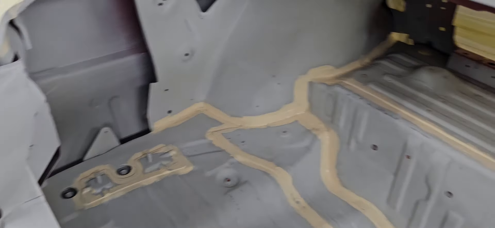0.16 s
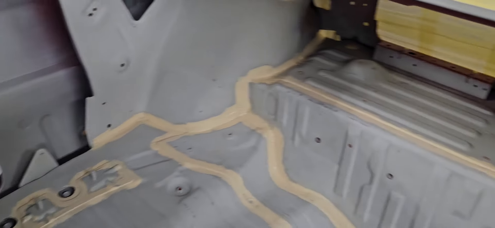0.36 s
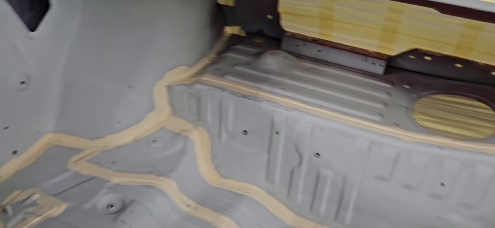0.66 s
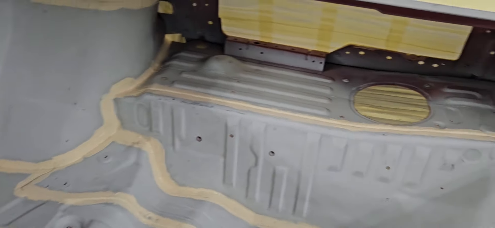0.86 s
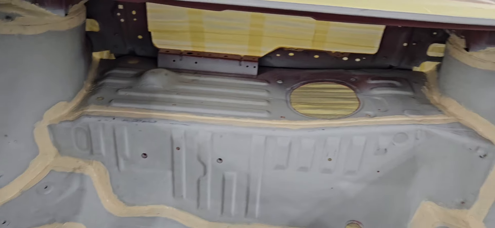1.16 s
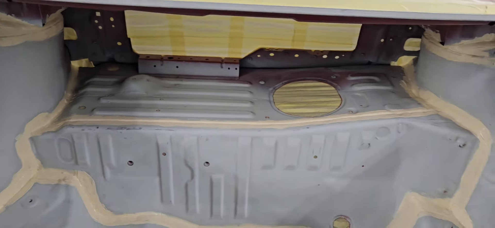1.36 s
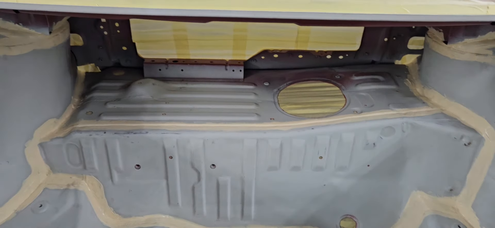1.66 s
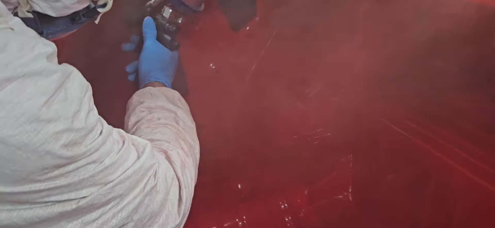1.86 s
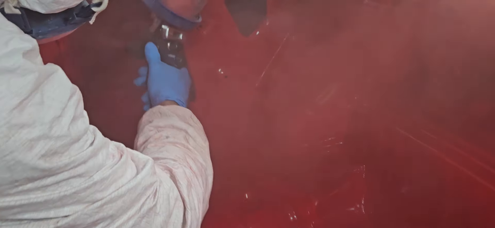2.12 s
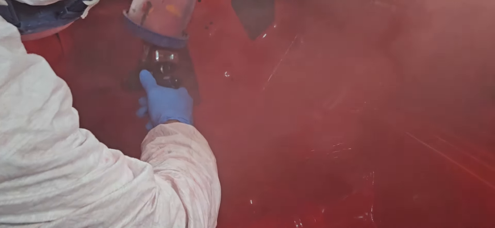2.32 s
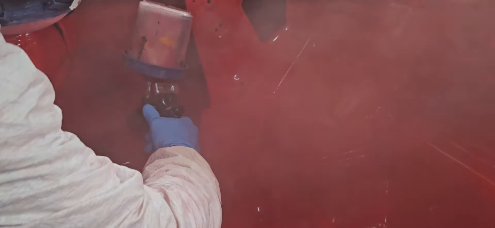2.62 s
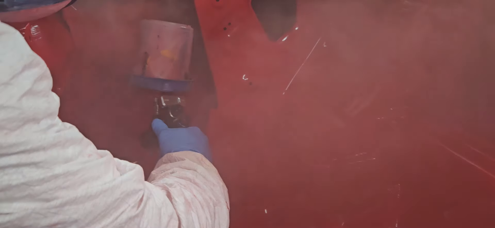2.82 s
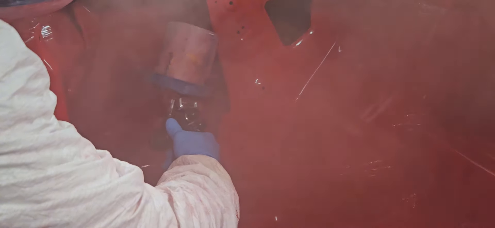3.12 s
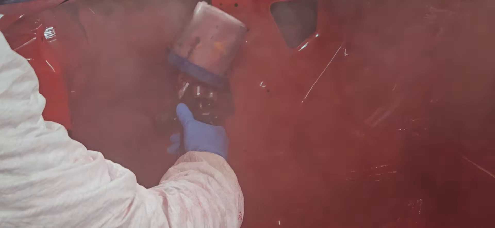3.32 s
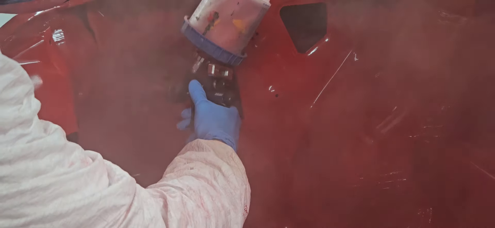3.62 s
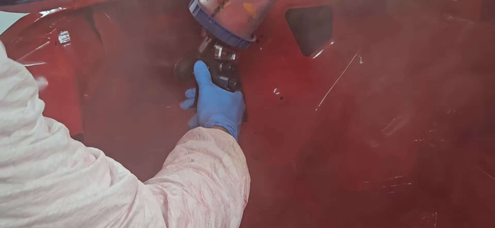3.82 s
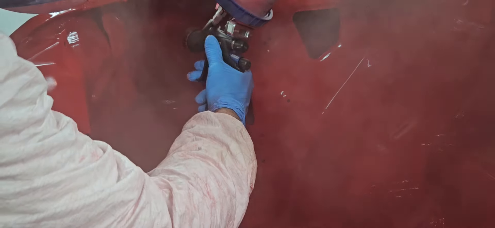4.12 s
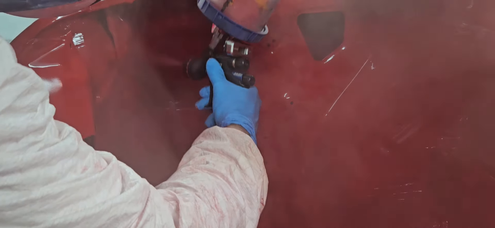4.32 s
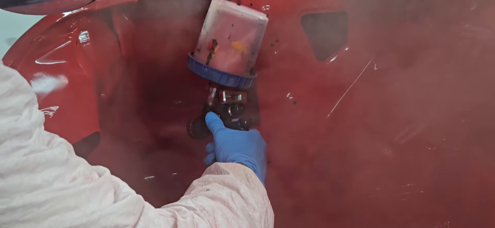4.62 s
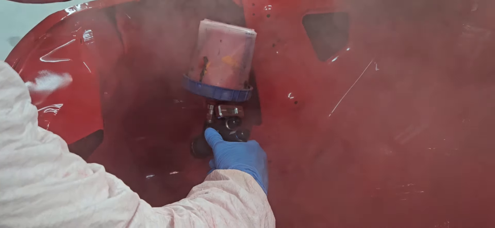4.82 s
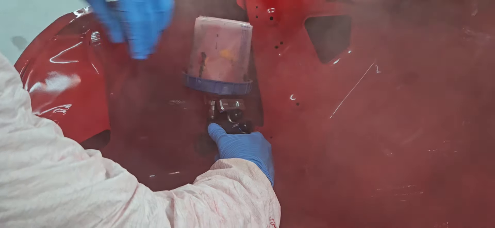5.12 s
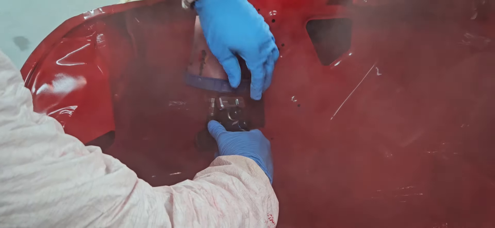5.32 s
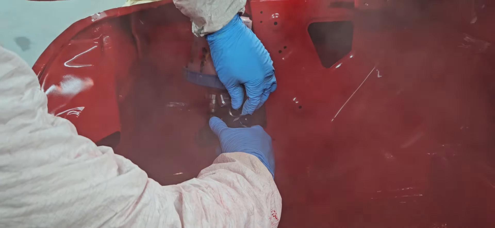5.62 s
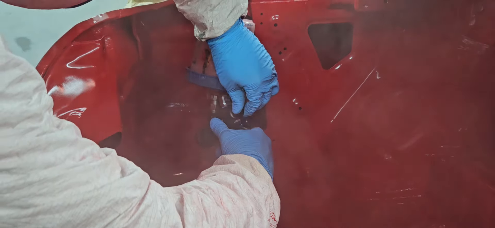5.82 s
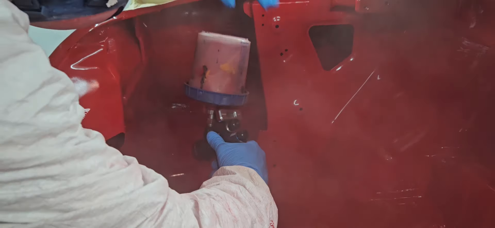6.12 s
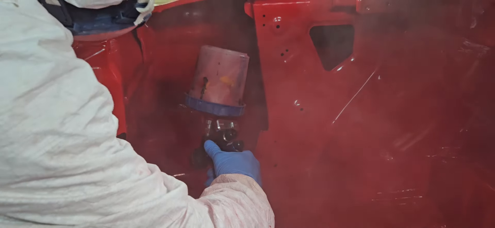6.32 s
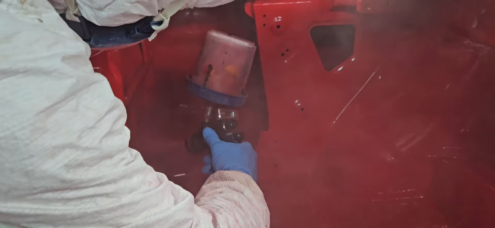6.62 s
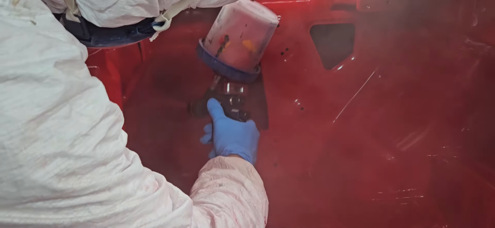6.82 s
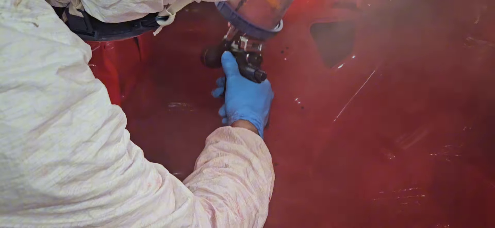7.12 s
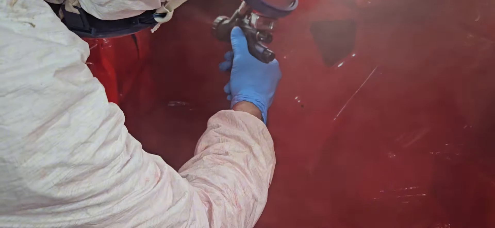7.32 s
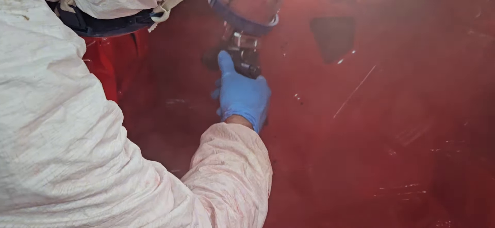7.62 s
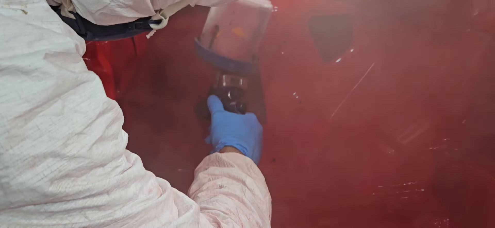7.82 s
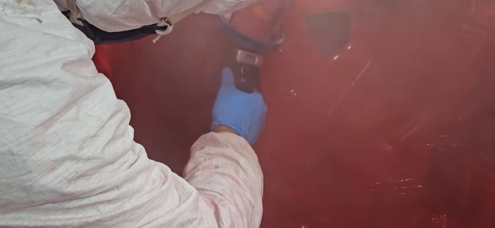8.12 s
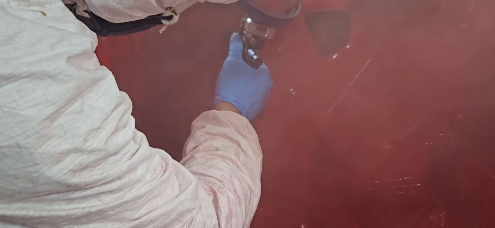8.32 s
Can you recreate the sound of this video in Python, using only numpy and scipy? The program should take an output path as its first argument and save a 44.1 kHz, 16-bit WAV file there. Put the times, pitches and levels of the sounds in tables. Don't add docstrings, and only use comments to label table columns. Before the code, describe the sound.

Quiet booth with faint fan hum, air hiss and gritty sole scuffs, then an abrupt loud spray gun hissing in passes over roaring extractors.

```python
import sys
import numpy as np
from scipy import signal
from scipy.fft import rfft, irfft, next_fast_len
from scipy.io import wavfile
from scipy.ndimage import uniform_filter1d, map_coordinates

SR = 44100
rng = np.random.default_rng(int(sys.argv[2]) if len(sys.argv) > 2 else 0)


def waveform_to_disk(signal):
    frames = np.transpose(np.atleast_2d(signal))
    scaled = np.clip(frames, -1, 1) * 32767
    samples = np.round(scaled).astype(np.int16)
    wavfile.write(sys.argv[1], SR, samples)


def to_linear_factor(level_db):
    exponent = np.asarray(level_db, float) / 20
    return 10 ** exponent


N = 373086
TIME = np.arange(N) / SR
IDLE_END_S, SPRAY_START_S = 1.873, 1.9112
IDLE_N = round(IDLE_END_S * SR)
TOP_HZ = 15735


def along(points, hz):
    f, v = np.transpose(points)
    return np.interp(np.log(hz + 1), np.log(f + 1), v)


def curves(rows):
    s, *cols = np.transpose(rows)
    return [np.interp(TIME, s, c) for c in cols]


def wobble(rate):
    knots = rng.standard_normal(int(N * rate / SR) + 4)
    return map_coordinates(knots, [TIME * rate])


def filtered(x, response):
    n = x.shape[-1]
    m = next_fast_len(n + 8192)
    return irfft(rfft(x, m) * response(np.fft.rfftfreq(m, 1 / SR)), m)[..., :n]


def shape(points):
    return lambda hz: to_linear_factor(along(points, hz))


def peaks(modes, base):
    return lambda hz: base + sum(to_linear_factor(db) / (1 + (2 * (hz - c) / w) ** 2) for c, w, db in modes)


def blur(x, bins, frames):
    x = uniform_filter1d(x, size=bins, axis=-2)
    x = uniform_filter1d(x, size=frames, axis=-1)
    return x / np.sqrt(np.mean(x ** 2))


# (frequency [Hz], level [dB])
LEFT_COLOUR = [(120, 1), (200, 4.5), (380, 0), (2400, 1.96), (5000, -4.5), (6900, 2.5), (7100, 4),
               (8600, 6.5), (9250, 1), (9330, -6.5), (10100, -6), (12200, -0.5), (12800, -0.5), (14500, 0),
               (15700, 4)]
# (frequency [Hz], level [dB])
RIGHT_COLOUR = [(120, 1), (200, 0), (380, 0), (2400, 1.3), (5300, 1), (6800, 3), (7300, 10.5), (8300, 8),
                (8950, 4), (9050, 1.5), (10000, -9.5), (11200, -6), (12400, 6), (13300, 3), (14300, 5),
                (15700, -5.5)]


def ports(hz):
    return to_linear_factor([along(LEFT_COLOUR, hz), along(RIGHT_COLOUR, hz)]) * (hz < TOP_HZ)


def field(gain, band, patchy_db, size=N, share=0, direct=0, lead=0):
    noise = rng.standard_normal((3, size), np.float32)
    hz, t, (a, b, one) = signal.stft(noise, SR, "cosine", nperseg=1024)
    port_gap_m, sound_m_per_s = 0.1255, 343
    turn = np.arccos(np.sinc(2 * hz * port_gap_m / sound_m_per_s))[:, None] / 2
    pair = lambda a, b: np.cos(turn) * a + np.sin(turn) * np.array([b, -b])
    diffuse = pair(a, b)
    re, im = blur(rng.standard_normal((2, 2) + a.shape, np.float32), bins=2, frames=30)
    room = pair(*(re + 1j * im)) / np.sqrt(2)
    share = np.clip(np.interp(t, TIME, share + 0 * TIME), 0, 1)
    lead = np.clip(np.interp(t, TIME, lead + 0 * TIME), 0, 99)
    late = np.exp(-2j * np.pi * np.outer(hz / SR, lead))
    straight = np.array([late ** 0, late])
    source = one * (np.sqrt(1 - direct) * room + np.sqrt(direct) * straight)
    z = np.sqrt(1 - share) * diffuse + np.sqrt(share) * source
    z = z * to_linear_factor(patchy_db * blur(rng.standard_normal(a.shape), bins=12, frames=5))
    x = signal.istft(z, SR, "cosine", nperseg=1024)[1][:, :size]
    x = filtered(x, lambda hz: gain(hz) * ports(hz))
    x = x / np.std(filtered(x.mean(0), lambda hz: (hz > band[0]) & (hz < band[1])))
    return np.pad(x, ((0, 0), (0, N - size)))


# (time [s], length [s], scrape level [dB], body over scrape [dB], grit over scrape [dB])
SOLE_DRAGS = [
    (0, 0.027, -74.5, 14, -4),
    (0.478, 0.093, -83, 21, 7),
    (0.568, 0.085, -54, 2, -6.5),
    (0.69, .09, -71, 9, -6),
    (0.797, 0.055, -54, 1.5, -9),
    (0.9, 0.19, -55, 5, -2),
    (1.258, 0.019, -64, 6, 4.5),
    (1.411, 0.016, -55.5, 5.5, 1.5),
    (1.59, 0.039, -64.5, 0, -1),
    (1.704, 0.025, -55.5, -14, -14),
]


def drags(fade_db_per_s, over_db=0):
    s, length, db = np.transpose(SOLE_DRAGS)[:3, :, None]
    t = TIME[None, :IDLE_N] - s
    rise = np.clip(t / (.008 + .25 * length), 0, 1)
    fade_db = fade_db_per_s * np.maximum(t - length, 0)
    gain = rise * to_linear_factor(db + np.reshape(over_db, (-1, 1)) - fade_db)
    return np.pad(gain.sum(0), (0, N - IDLE_N))


LIFT_DB_PER_S, BODY_DB_PER_S, GRIT_DB_PER_S = 180, 110, 150

# (frequency [Hz], level per Hz [dB])
HUM_SPECTRUM = [(15, -38), (25, -9), (86, 2), (220, -14), (244, -6), (375, -24), (671, -22), (1180, -37),
                (1500, -23), (1950, -56), (3300, -120)]


def idle_fans():
    fans_db, shake_db, shake_s, sway_db = -55.5, 2, .08, 1.2
    shake = to_linear_factor(shake_db) * uniform_filter1d(drags(LIFT_DB_PER_S), size=round(shake_s * SR))
    level = np.hypot(to_linear_factor(fans_db), shake) * to_linear_factor(sway_db * wobble(6.1))
    return level * field(shape(HUM_SPECTRUM), (40, 300), 1, IDLE_N)


# (frequency [Hz], width [Hz], level [dB])
VALVE_PEAKS = [(1960, 310, 4.5), (2720, 600, -9), (3220, 630, -3), (4770, 660, -5)]


def closing_valve():
    level_db, drop_db, shut_s, bend = -63, 17, 0.56, 3.3
    closing = np.clip(TIME / shut_s, 0, 1)
    level = to_linear_factor(level_db - drop_db * closing ** bend) * (closing < 1)
    whistle = field(peaks(VALVE_PEAKS, .02), (1700, 3800), .8, IDLE_N, 0.55, 0.94, lead=11)
    return level * whistle * to_linear_factor([[-2], [2.2]])


# (time [s], share of the leak's own paths, left lead [samples])
PORT_TURN = [(0, .65, 21), (.25, .65, 22), (.45, .65, 24), (.58, .75, 23.8), (.66, .75, 21.5),
             (.76, .75, 18), (1, .55, 15.5), (1.2, .3, 16.5), (1.87, .3, 17.5)]
# (frequency [Hz], level per Hz [dB])
LEAK_SPECTRUM = [(600, -50), (1200, -32), (2000, -21), (3800, -15), (5300, -11), (6600, -17), (7400, -15.5),
                 (10000, -13.5), (12500, -11.5), (14000, -14.5), (14800, -7.5), (15900, -4)]


def air_leak():
    level_db, sag_db_per_s, pan_db, pan_db_per_sample = -56.5, 0.5, 3, .3
    share, lead = curves(PORT_TURN)
    hiss = field(shape(LEAK_SPECTRUM), (7000, 15700), 0.83, IDLE_N, share, .7, lead)
    pan_db = pan_db + pan_db_per_sample * (lead[0] - lead)
    return to_linear_factor(level_db - sag_db_per_s * TIME) * hiss * to_linear_factor(np.outer([.5, -.5], pan_db))


# (time [s], peak level [dB], decay time to -60 dB [s])
SOLE_TICKS = [
    (0.5683, -51, 0.03),
    (0.6444, -48, 0.03),
    (0.799, -50, 0.033),
    (1.261, -61, 0.03),
    (1.4108, -36.5, 0.007),
    (1.6107, -58, 0.03),
    (1.7115, -56, 0.03),
]
# (time [s], peak level [dB], frequency [Hz], decay time to -60 dB [s])
FLOOR_KNOCKS = [
    (0.484, -37, 196, 0.04),
    (1.712, -38, 62.3, 0.04),
]
# (frequency [Hz], level per Hz [dB])
SCRAPE_SPECTRUM = [(290, -25), (500, -5), (578, -14), (629, -2), (1520, -13.5), (1800, -7.5), (4250, -12),
                   (9000, -28), (11700, -56), (19800, -120)]
# (frequency [Hz], level per Hz [dB])
BODY_SPECTRUM = [(88, -45), (150, -18), (222, -6), (254, -15.5), (435, -6), (900, -37), (1170, -47),
                 (1980, -120)]


def feet():
    *_, body_db, grit_db = np.transpose(SOLE_DRAGS)
    rasp = to_linear_factor(1.3 * wobble(60.3))
    body = rasp * drags(BODY_DB_PER_S, body_db)
    out = body * field(shape(BODY_SPECTRUM), (250, 600), 0.73, IDLE_N)
    ticks = sum(to_linear_factor(db - 7.0 - 60 * abs(TIME - s) / t60) * (TIME > s) for s, db, t60 in SOLE_TICKS)
    scrape = shape(SCRAPE_SPECTRUM)
    fine = lambda hz: 1 / (1 + (2200 / (hz + 1)) ** 4)
    coarse = field(lambda hz: scrape(hz) * (1 - fine(hz)), (600, 2000), 0.86, IDLE_N)
    out += (rasp * drags(LIFT_DB_PER_S) + ticks) * coarse
    sand = field(lambda hz: scrape(hz) * fine(hz), (2500, 6500), 0.7, IDLE_N)
    grit = rasp * drags(GRIT_DB_PER_S, grit_db) + to_linear_factor(1.0) * ticks
    out += grit * to_linear_factor([[-1.5], [1.5]]) * sand
    for s, db, hz, t60 in FLOOR_KNOCKS:
        t = np.maximum(TIME - s, 0)
        out += to_linear_factor(db + 1.0 - 60 * (t / t60) ** 2) * np.sin(-2 * np.pi * hz * t)
    return out


# (time [s], level [dB])
FAN_LEVEL = [
    (1.92, -20.5),
    (2.39, -19.5),
    (3.72, -23.5),
    (3.81, -21.5),
    (4.98, -24),
    (5.09, -22),
    (6.2, -22),
    (6.25, -20.5),
    (8.46, -21.5),
]
# (frequency [Hz], level per Hz [dB])
ROAR_SPECTRUM = [(12, -38), (20, -6), (97, -2), (291, -10.5), (374, -15), (462, -19.5), (1020, -23.5),
                 (1470, -32), (1710, -21), (2000, -57), (2600, -65), (4400, -120)]
# (frequency [Hz], width [Hz], level [dB])
BOOTH_MODES = [(47, 9.5, 6), (70.5, 12, 6), (100, 9.9, 12.5), (123, 2.4, -19), (161.3, 18, 1.5),
               (248.8, 11, 4.5), (318, 9.6, 2.5), (360, 7.6, 13), (374.3, 23.5, 10.5), (403, 9.7, -9),
               (520.3, 6.4, 7.5), (585.6, 5.5, 3.5)]


def extractors():
    gain = lambda hz: to_linear_factor(along(ROAR_SPECTRUM, hz)) * peaks(BOOTH_MODES, 1)(hz)
    roar = field(gain, (30, 450), 0.35, share=0.52, direct=0.9, lead=14.3)
    return to_linear_factor(curves(FAN_LEVEL)[0] + 0.16 * wobble(2.9)) * roar


# (start time [s], stop time [s], paint level [dB], paint growth [dB], air level [dB])
SPRAY_PASSES = [
    (1.967, 2.865, -27.5, 0.5, -24),
    (3.237, 4.077, -30.5, 2, -26),
    (4.228, 4.782, -30, 1.5, -26.5),
    (6.495, 7.36, -29.5, 2, -24.5),
    (7.484, 7.883, -29.5, 1, -24.5),
    (8.01, 8.36, -29.5, 0, -25.5),
]


def needle():
    travel_s, bare_air_db, air_rise_db, spurt_db, spurt_s = 0.03, -19.5, 4, 2.5, 0.09
    mist_db, drip_db = -31, -36.5
    shut_db = np.where(TIME < np.mean(SPRAY_PASSES[0][:2]), mist_db, drip_db)
    air_db = bare_air_db + spurt_db * np.exp(-abs(TIME - SPRAY_START_S) / spurt_s)
    paint_db = shut_db
    for start, stop, wet_db, grows_db, damped_db in SPRAY_PASSES:
        opened = np.clip(np.minimum(TIME - start, stop - TIME) / travel_s + .5, 0, 1)
        done = np.clip((TIME - start) / (stop - start), 0, 1)
        spurt = spurt_db * (done > .5) * np.exp(-np.maximum(TIME - stop, 0) / spurt_s)
        open_air_db = damped_db + air_rise_db * done
        air_db = air_db + opened * (open_air_db - bare_air_db) + (1 - opened) * spurt
        paint_db = paint_db + opened * (wet_db + grows_db * (done - .5) - shut_db)
    return air_db, paint_db


# (frequency [Hz], level per Hz [dB])
AIR_SPECTRUM = [(600, -57), (1000, -28.5), (1470, -23.5), (1720, -25.5), (2200, -18), (2500, -22.5),
                (3200, -16), (3600, -15.5), (5000, -8.5), (7000, -8), (10000, -3), (15900, 0)]
# (frequency [Hz], level over bare air [dB])
DROPLET_TILT = [(500, 43.5), (1000, 13), (2200, 9.5), (4500, 7.5), (7500, 0.5), (10000, -6), (15900, -26)]


def gun():
    hand_db, drift_db_per_s, sway_db = 0.84, 0.1, .5
    air_db, paint_db = needle()
    flutter = .5 * wobble(14) + 0.17 * wobble(90)
    jet = field(shape(AIR_SPECTRUM), (11500, 15800), 0.4, share=0.49, direct=0.036, lead=14.9)
    wet_gain = lambda hz: to_linear_factor(along(AIR_SPECTRUM, hz) + along(DROPLET_TILT, hz))
    wet = field(wet_gain, (1500, 4500), 0.22, share=.45, direct=0.14, lead=18.3)
    hiss = to_linear_factor(air_db + flutter) * jet + to_linear_factor(paint_db - 3.5 + flutter) * wet
    pan_db = hand_db + drift_db_per_s * (TIME - SPRAY_START_S) + sway_db * wobble(3.99)
    return hiss * to_linear_factor(np.outer([.5, -.5], pan_db))


def scene():
    idle = idle_fans() + closing_valve() + air_leak() + feet()
    fade_in = np.clip((TIME - SPRAY_START_S) / .0005, 0, 1)
    return idle * (TIME < IDLE_END_S) + (extractors() + gun()) * fade_in


# (frequency [Hz], threshold relative to the treble's mean [dB])
BAND_THRESHOLD = [(1100, -50), (1500, -30), (1720, -16), (2100, -25), (2650, -21), (3100, -23), (3700, -12.5),
                  (4100, -28), (8800, -19), (9600, -13.5), (10500, -16), (13000, -22)]


def drop_weak_bands(x):
    hz, _, z = signal.stft([x[0] + x[1], x[0] - x[1]], SR, "cosine", nperseg=2048)
    power = uniform_filter1d(abs(z) ** 2, size=4, axis=1)
    treble = power[:, (hz > 4000) & (hz < TOP_HZ)].mean(axis=(0, 1))
    mask = treble * to_linear_factor(2 * along(BAND_THRESHOLD, hz))[:, None]
    keep = power ** 3 / (power ** 3 + mask ** 3 + 1e-60) * (hz < TOP_HZ + 60)[:, None]
    mid, side = signal.istft(z * keep, SR, "cosine", nperseg=2048)[1][:, :N]
    return np.array([mid + side, mid - side]) / 2


def band_limit(x):
    return signal.sosfilt(signal.butter(12, 16940, fs=SR, output="sos"), x)


def record(dry):
    sounding = (TIME < IDLE_END_S) | (TIME > SPRAY_START_S)
    mix = drop_weak_bands(np.clip(dry, -1, 1)) * sounding
    return band_limit(mix)


dry = scene()
out = record(dry)
waveform_to_disk(out)
```